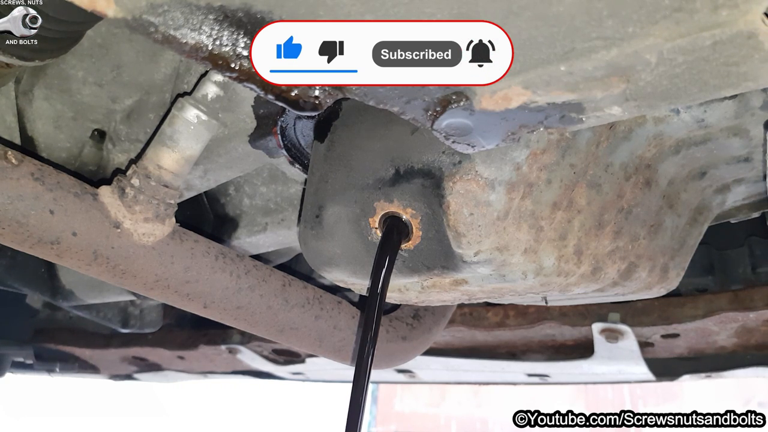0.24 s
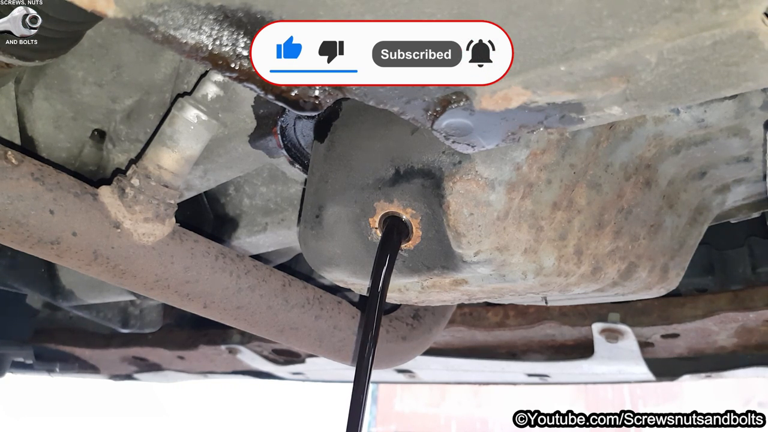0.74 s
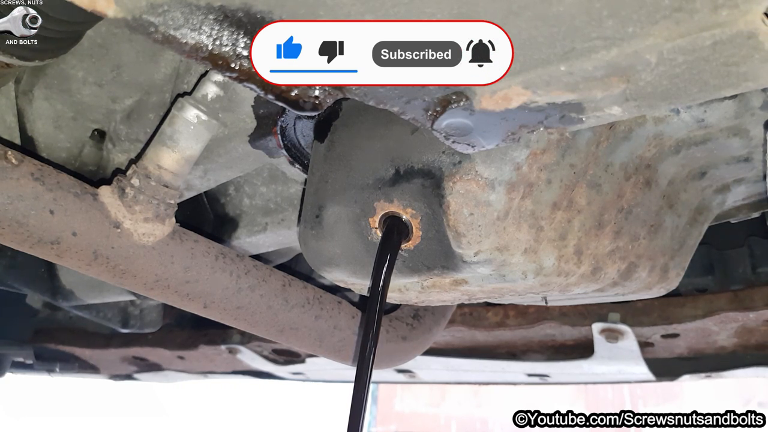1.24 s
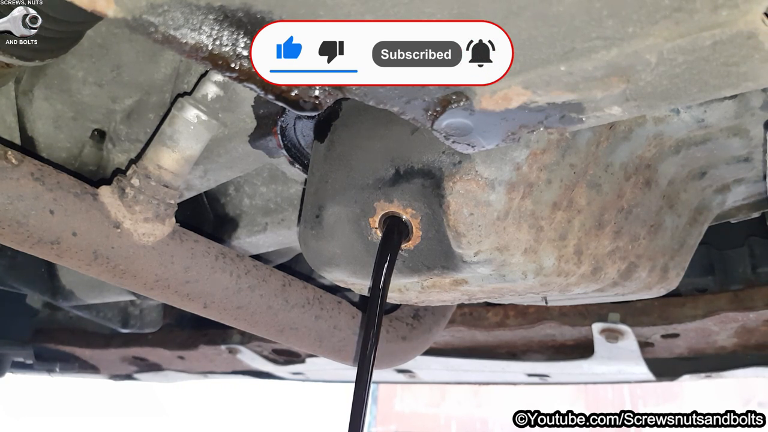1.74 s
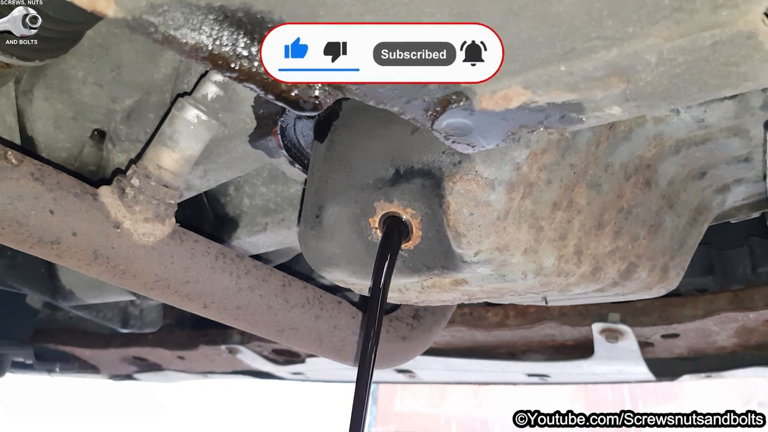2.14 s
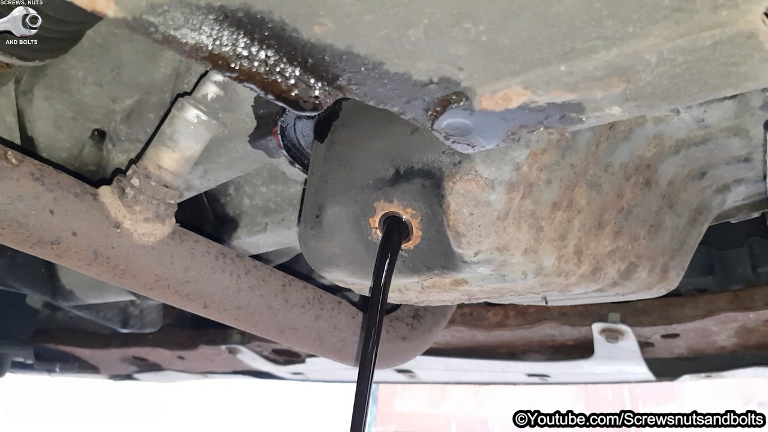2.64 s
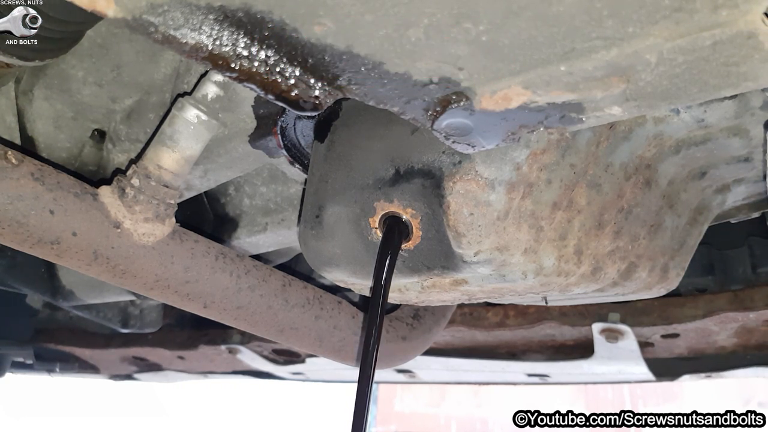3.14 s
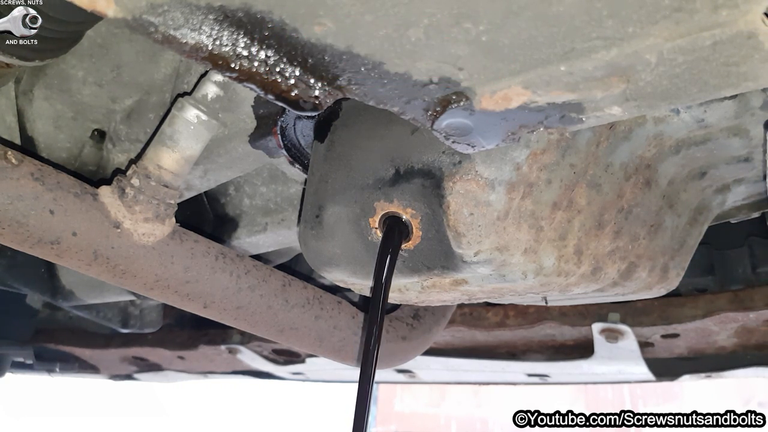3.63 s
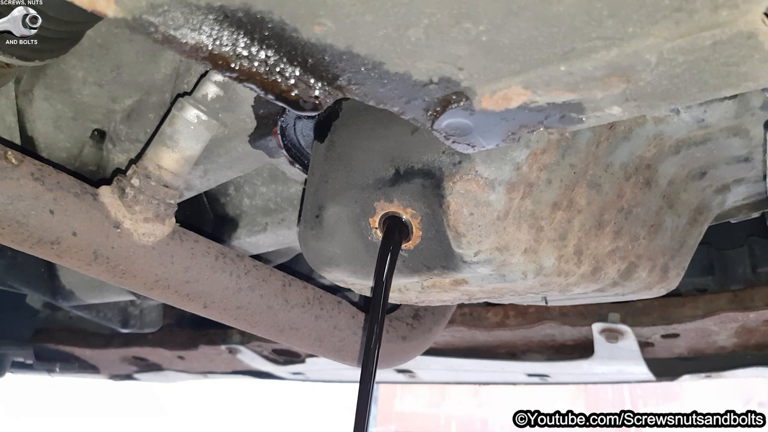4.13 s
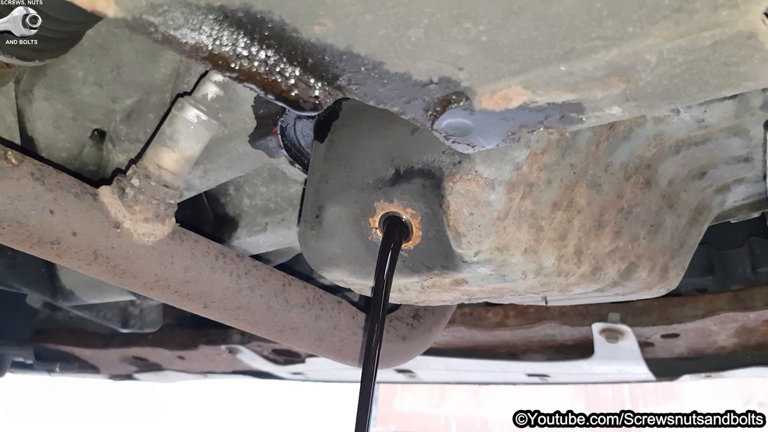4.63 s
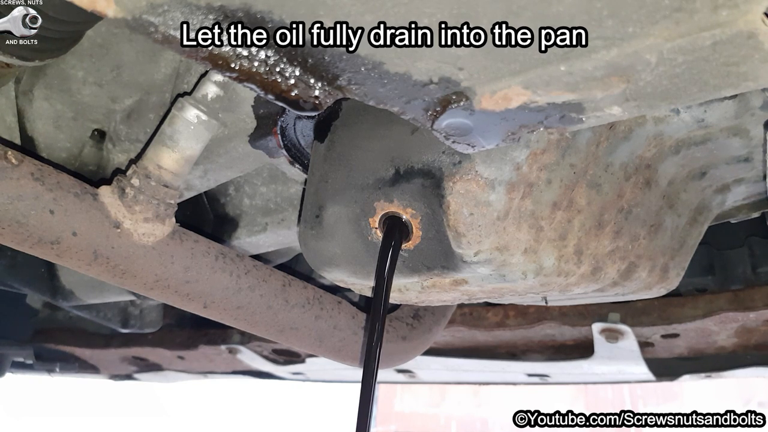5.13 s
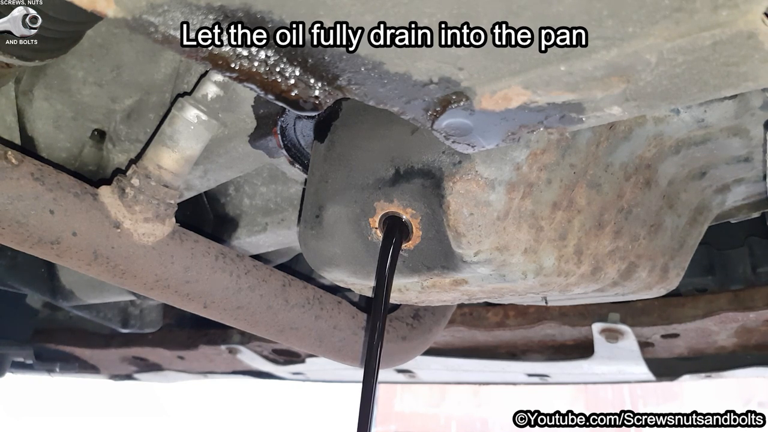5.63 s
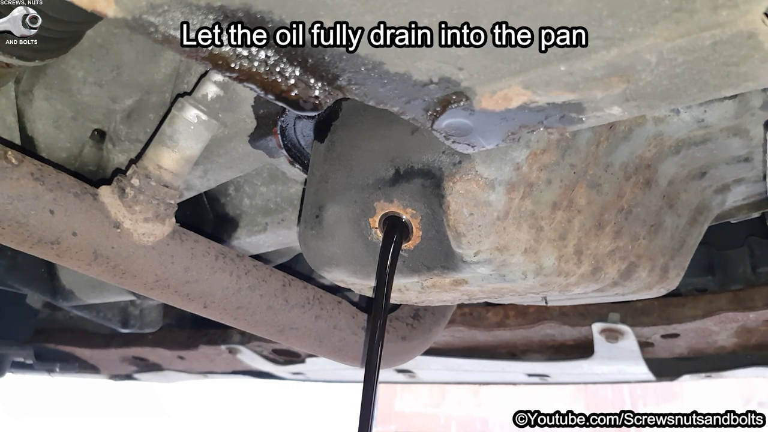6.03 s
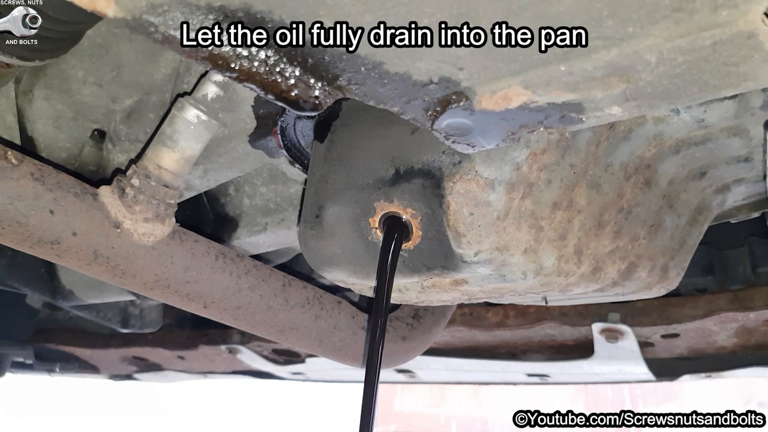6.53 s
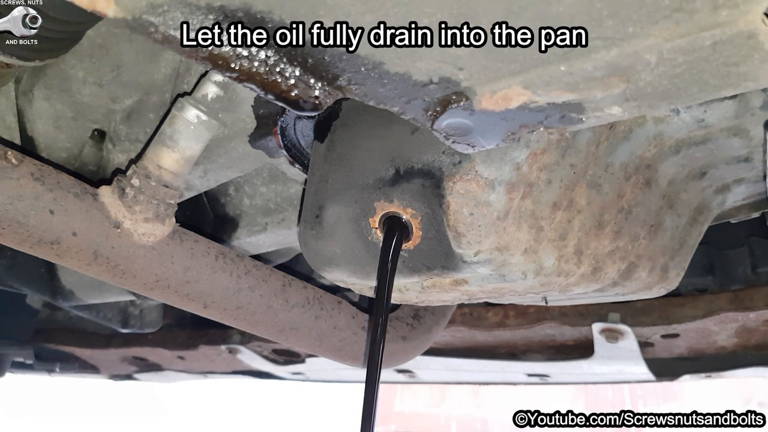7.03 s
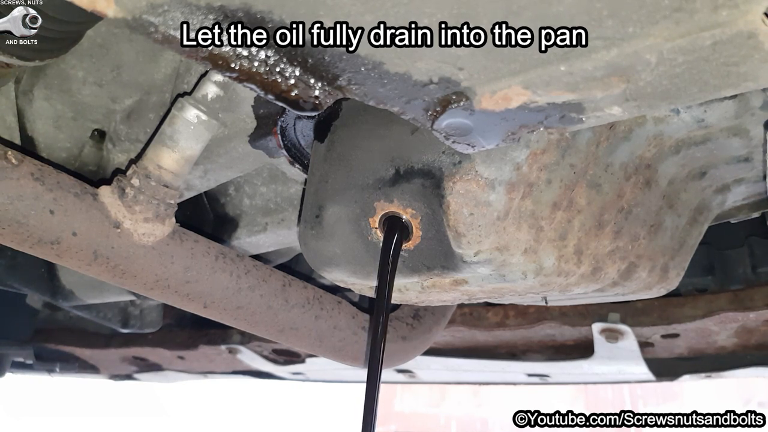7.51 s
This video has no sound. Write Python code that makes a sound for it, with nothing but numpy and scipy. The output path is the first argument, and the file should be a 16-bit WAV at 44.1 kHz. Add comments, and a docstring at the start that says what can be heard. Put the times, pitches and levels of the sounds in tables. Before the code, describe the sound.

Low oil drone around a deep bass pitch swells and fades unevenly throughout, over muffled gulping and churning. Beside it someone shifts: early cloth rubs, snaps and floor scuffs, one bright clink, then mostly oil alone. Later, short gritty metal drags end in ringing clinks, and quick rustles close the scene. Close stereo microphone, sources a little right, only knocks echoing briefly in a garage.

```python
"""Used engine oil runs from a sump into a catch pan on a garage floor, heard close and a little to the right.
The smooth jet plunges into the pool: a pulsing air cavity drones near 80 Hz over soft gulps and churning.
Beside it someone shifts about: clothes rustle as noise swells and snaps, and the floor is scuffed.
A steel tool is dragged in short strokes and clinks; noise and grit ring its modes.
A stereo microphone adds port colour; a faint hiss lies under it all, and only the knocks echo."""
import sys
import numpy as np
from scipy import signal
from scipy.io import wavfile

SR = 44100
rng = np.random.default_rng(int(sys.argv[2]) if len(sys.argv) > 2 else 0)


def store_pcm(level_fs):
    """Save levels as 16-bit WAV."""
    pcm = np.round(np.clip(level_fs, -1, 1) * 32767).astype(np.int16)
    wavfile.write(sys.argv[1], SR, np.atleast_2d(pcm).T)


N = 342462   # samples


def from_db(db):
    """Decibels to gain."""
    return 10 ** (np.asarray(db) / 20)


def rms_one(x):
    """Scale to unit power."""
    return x / np.sqrt(np.mean(x ** 2) + 1e-20)


def in_time(rows):
    """The columns of a curve, sample by sample."""
    s, *columns = np.transpose(rows)
    return [np.interp(np.arange(N) / SR, s, column) for column in columns]


def panned(x, pan_db):
    """Place a sound by its left-right level difference; negative is to the right."""
    left = from_db(pan_db / 2) * np.ones(N)
    return x * np.array([left, 1 / left])


def filtered(x, order, hz, kind):
    """Butterworth filter: a band, or all above or below one frequency."""
    return signal.sosfilt(signal.butter(order, hz, kind, fs=SR, output="sos"), x)


def drift(rate_hz):
    """Slow chance with spread 1: noise through two equal low-pass poles."""
    step, settle = 40, 2000   # samples per slow value; slow values dropped at the start
    r = np.exp(-2 * np.pi * rate_hz * step / SR)
    noise = rng.standard_normal(N // step + settle + 2)
    slow = signal.lfilter([1], [1, -2 * r, r * r], noise)[settle:]
    return np.interp(np.arange(N) / step, np.arange(len(slow)), rms_one(slow))


def grains(per_s, spread_db):
    """Random clicks of uneven size and either sign, at unit power."""
    size_db = spread_db * np.minimum(rng.exponential(1, N), 4)
    sizes = from_db(size_db) * rng.choice([-1, 1], N)
    return rms_one(sizes * (rng.random(N) < per_s / SR))


def coloured(spectrum, flicker_db, flicker_rate, alike_hz):
    """Stereo noise in flickering third-octave bands; the two sides agree more the lower the band."""
    points, levels = np.transpose(spectrum)
    bands = int(3 * np.log2(points[-1] / points[0]))
    edges = np.geomspace(points[0], min(points[-1], .45 * SR), bands + 1)
    white, out = rng.standard_normal((2, 2, N)), 0
    for k, (low, high) in enumerate(zip(edges, edges[1:])):
        mid, side = filtered(white[k % 2], 2, [low, high], "band")
        hz = np.sqrt(low * high)
        alike = 1 / (1 + (hz / alike_hz) ** 2)
        level_db = np.interp(np.log(hz), np.log(points), levels)
        gain = from_db(level_db + flicker_db * drift(flicker_rate))
        shared, opposed = np.sqrt(1 + alike) * mid, np.sqrt(1 - alike) * np.array([side, -side])
        out = out + gain * (shared + opposed)
    return rms_one(out)


def contacts(events, decay_s):
    """Each contact is a short decaying crunch of noise, different on the two sides."""
    starts = np.zeros(N)
    for s, db in events:
        starts[round(s * SR)] = from_db(db)
    envelope = signal.lfilter([1], [1, -np.exp(-1 / (decay_s * SR))], starts + 1e-18)
    return envelope * rng.standard_normal((2, N))


def resonance(drive, hz, width_hz):
    """A two-pole band-pass resonance with gain close to 1 on top."""
    r = np.exp(-np.pi * width_hz / SR)
    feedback = [1, -2 * r * np.cos(2 * np.pi * hz / SR), r * r]
    return signal.lfilter((1 - r * r) / 2 * np.array([1, 0, -1]), feedback, drive + 1e-18)


def ringing(drive, modes):
    """Modes driven together, with alternating sign."""
    return sum((-1) ** k * from_db(db) * resonance(drive, hz, width)
               for k, (hz, width, db) in enumerate(modes))


def stroke(start_s, rise_s, hold_s, fall_s):
    """Gain of one movement: it climbs 20 dB in rise_s, holds, and drops 20 dB in each fall_s."""
    t = np.arange(N) / SR - start_s
    return from_db(-20 * np.clip(np.maximum(-t / rise_s, (t - hold_s) / fall_s), 0, 10))


# the cavity round the jet locks into surges of droning: start_s, length_s, level_db
DRONE_SURGES = [(0.01, 0.19, -37), (0.213, 0.2, -29.5), (.515, .14, -29.5), (0.73, 0.11, -32),
                (0.86, 0.29, -40.5), (1.56, 0.9, -32.5), (2.39, 0.49, -33.5), (2.68, 0.27, -31),
                (3.11, .21, -32.5), (3.493, 0.24, -34), (3.819, .55, -36.5), (4.375, .31, -35),
                (4.722, 0.26, -31), (5.025, 0.25, -34.5), (5.391, 0.43, -36.5), (5.858, 0.19, -39.5),
                (6.02, 0.3, -36), (6.292, 0.26, -35), (6.783, 0.2, -37), (7.128, .12, -34.5)]
SURGE_ATTACK_S, SURGE_RELEASE_S = 0.058, 0.14


def surge(start_s, length_s):
    """Gain of one surge: a rounded attack, a hold and a rounded release."""
    t = np.arange(N) / SR - start_s
    ramp = np.minimum(t / SURGE_ATTACK_S, (length_s - t) / SURGE_RELEASE_S)
    return np.sin(np.pi / 2 * np.clip(ramp, 0, 1))


# pitch of the plunging jet: time_s, pitch_hz
JET_PITCH_CURVE = [(0, 87.5), (.24, 97.4), (.65, 99), (.86, 81.6), (1.15, 76.5), (1.9, 78.5), (2.44, 81),
                   (3.48, 81.85), (5.5, 86.3), (6.3, 83), (7.77, 81)]
# steady buzz under the surges, as the level of its octave: time_s, level_db
BUZZ_CURVE = [(0, -42), (.2, -49), (.35, -44.5), (.55, -61.5), (1.1, -57), (1.23, -39), (1.358, -44.5),
              (1.94, -38), (2.1, -45), (2.44, -48.5), (2.6, -45.5), (3.3, -42), (3.5, -47), (4.4, -52),
              (5.6, -47.5), (5.8, -54), (7.77, -49)]
BUZZ_FUNDAMENTAL_DB, BUZZ_UPPER_DB = 2.5, -14   # relative to the octave
# upper partials of the buzz: multiple, relative_db
BUZZ_OVERTONES = [(3, -1.5), (4, -9), (5, -12), (6, -24.5)]
# air gulped under the surface, here and in gulps(): time_s, relative_db
GULP_CURVE = [(0, -48.5), (.75, -44), (1.6, -52), (2.9, -50.5), (4.3, -51.5), (5.4, -51), (5.75, -48),
              (7.77, -52)]
# a slower sway of the pool builds up and stays
SWAY_HZ, SWAY_START_DB, SWAY_DB = 51.1, -61.5, -49
SWAY_FULL_S, SWAY_BUILD_S = 6, 0.63
COUPLING_DB = 33   # how strongly the sway rocks the droning cavity


def jet_drone():
    """The cavity round the jet pulses almost regularly, in surges; gulps upset its rhythm."""
    pitch, buzz_db, gulp_db = (in_time(rows)[0] for rows in (JET_PITCH_CURVE, BUZZ_CURVE, GULP_CURVE))
    upset = from_db(gulp_db - np.max(gulp_db))
    jitter = 2 * 0.01554 * upset * drift(16.27)
    phase = 2 * np.pi * np.cumsum(pitch * (1 + jitter)) / SR

    # surges and steady buzz add in power
    surging = sum((from_db(db) * surge(s, length)) ** 2 for s, length, db in DRONE_SURGES)
    depth = np.sqrt(surging + from_db(buzz_db + BUZZ_FUNDAMENTAL_DB) ** 2)
    first = depth * from_db(-0.24 * drift(18)) * np.sin(phase)
    octave = from_db(buzz_db + 2.5 * drift(12.5)) * np.sin(2 * phase + .5 * drift(1.2))
    upper = 0
    for multiple, db in BUZZ_OVERTONES:
        gain = from_db(buzz_db + BUZZ_UPPER_DB + db + 3.5 * drift(12))
        upper = upper + gain * np.sin(round(multiple) * phase + 0.56 * drift(5.9))

    # the sway rocks the cavity, which adds a tone at the sum of the two rates
    sway_db, = in_time([(SWAY_FULL_S - SWAY_BUILD_S, SWAY_START_DB), (SWAY_FULL_S, SWAY_DB)])
    sway_phase = 2 * np.pi * np.cumsum(SWAY_HZ * (1 + 0.041 * drift(5.15))) / SR
    rocked = depth * from_db(COUPLING_DB) * np.sin(phase + sway_phase)
    sway = from_db(sway_db + 1.4 * drift(6.1)) * (np.sin(sway_phase) + rocked)
    # root 2 gives each sine the power its level states
    return np.sqrt(2) * (panned(first + sway, -.7) + panned(octave, -3.6) + panned(upper, -1.2))


# sloshing resonances of the filled pan: pitch_hz, width_hz, relative_db
POOL_MODES = [(48.5, 18, -0.5), (89.5, 9.5, 3), (126.2, 26.5, 1.5), (184, 90, -20.5), (280, 63, -13.5)]


def gulps():
    """Pockets of air collapse in the thick oil and rock the pool's damped resonances."""
    level_db, = in_time(GULP_CURVE)
    pool = sum(from_db(db) * rms_one(resonance(grains(150, 1.4), hz, width))
               for hz, width, db in POOL_MODES)
    pool = filtered(pool, 2, [40, 380], "band")
    return panned(from_db(level_db - 1.0) * pool, -3.0)


# churning where the jet enters, power per Hz: frequency_hz, relative_db
CHURN_COLOUR = [(25, 1.5), (50, 10), (150, 3.5), (300, -2.5), (450, -5), (700, -12.5), (1100, -14),
                (1500, -24), (2500, -34), (5000, -48)]
CHURN_DB = -55.5   # before panning


def churn():
    """A dull, flickering wash of noise; its upper part comes more from the right."""
    wash = from_db(CHURN_DB) * coloured(CHURN_COLOUR, flicker_db=2.0, flicker_rate=22, alike_hz=590)
    upper = filtered(wash, 1, [560, 880], "band")
    return panned(wash - upper, -1.7) + panned(upper, -16)


# steady faint hiss, power per Hz: frequency_hz, relative_db
HISS_COLOUR = [(1000, 15), (2500, 4), (4000, 0), (6500, 2.5), (8000, -8), (11000, 6), (16000, 9)]
HISS_DB = -72   # before panning


def faint_hiss():
    """Bright noise without flicker, nearly independent on the two sides."""
    hiss = coloured(HISS_COLOUR, flicker_db=0.0, flicker_rate=8, alike_hz=200)
    return panned(from_db(HISS_DB) * hiss, -1.2)


# clothes and soles swell, hold and die away; rise and fall are times for 20 dB:
# full_s, rise_s, hold_s, fall_s, rub_relative_db, swish_relative_db
MOVEMENTS = [(0.0, .1, 0.0074, 0.38, -53.5, -59.5), (0.294, 0.14, 0.23, 0.088, -55, -53.5),
             (0.387, 0.046, 0.024, 0.042, -52.5, -54), (0.596, .1, 0.12, 0.05, -59, -57.5),
             (0.982, 0.27, 0.071, 0.2, -50, -48.5), (1.33, 0.23, .02, 0.65, -87, -70.5),
             (1.606, 0.2, .02, 0.39, -60.5, -58.5), (1.948, 0.56, 0.026, 0.22, -62.5, -60),
             (2.62, 1, .03, 0.37, -91, -73.5), (4.747, 0.12, .17, 0.25, -63.5, -63),
             (5.265, 0.31, .33, .3, -84, -67.5), (5.64, 0.83, .28, 0.16, -63, -68.5),
             (6.086, 0.22, 0.035, .1, -76, -67), (6.301, 0.22, 0.17, 0.16, -64.5, -67.5),
             (6.53, 0.2, 0.3, 0.69, -76.5, -72), (7.166, 0.19, 0.028, 0.081, -69.5, -57),
             (7.3, 0.071, 0.014, .1, -62.5, -56), (7.388, .04, 0.018, 0.36, -72, -64.5),
             (7.533, 0.024, 0.026, 0.27, -61, -59.5), (7.637, 0.024, 0.027, 0.087, -58, -59.5),
             (7.72, .03, .05, .2, -58.5, -64)]


def movement_gains():
    """How hard the clothes rub and swish; overlapping movements add in power."""
    power = sum((from_db([[rub_db], [swish_db]]) * stroke(s, rise, hold, fall)) ** 2
                for s, rise, hold, fall, rub_db, swish_db in MOVEMENTS)
    return np.sqrt(power)


# dull rub of cloth, power per Hz: frequency_hz, relative_db
RUB_SPECTRUM = [(300, -10), (600, 5), (900, 2.5), (1300, 3.5), (1700, 3.5), (2400, 2.5), (3500, -2.5),
                (5000, -3.5), (8000, -21)]
# bright swish of cloth, power per Hz: frequency_hz, relative_db
SWISH_SPECTRUM = [(2500, -10.5), (4200, -3), (6500, 1.5), (8300, -0.5), (11000, 4), (13000, 1.5),
                  (16000, 2)]
# creases and grit snapping: start_s, drive_db
SNAPS = [(0.168, -45), (0.298, -36), (1.301, -69), (1.341, -48.5), (1.782, -39.5), (1.939, -46),
         (2.092, -48.5), (6.111, -49), (6.193, -42), (6.387, -36), (7.268, -40), (7.297, -42),
         (7.39, -42.5), (7.536, -45), (7.634, -41), (7.72, -47)]


def clothes():
    """Fibres catch and slip: a dull rub, a bright swish and a few snapping creases."""
    rub = coloured(RUB_SPECTRUM, flicker_db=2.0, flicker_rate=18.5, alike_hz=300)
    rub = rub * from_db(0.29 * drift(160))
    swish = coloured(SWISH_SPECTRUM, flicker_db=1.6, flicker_rate=16, alike_hz=300)
    # each slip starts at once and dies in a few milliseconds
    slips = signal.lfilter([1], [1, -np.exp(-1 / (0.0068 * SR))], np.abs(grains(160, 3.0)))
    swish = from_db(2.1) * rms_one(swish * (1 + 0.2 * rms_one(slips)))
    snaps = from_db(-5) * filtered(contacts(SNAPS, decay_s=0.0063), 2, [5500, 15500], "band")
    rub_gain, swish_gain = movement_gains()
    return panned(rub_gain * rub, -6.5) + panned(swish_gain * swish, -7.0) + panned(snaps, -4.5)


def hollow_rub():
    """The hardest rubs also sound a broad hollow resonance, which grows faster than the rubbing."""
    force = movement_gains()[0]
    tone = rng.standard_normal((2, N))
    for stage in range(2):
        tone = resonance(tone, 2570, 1480)
    return panned(from_db(-54.5) * (force / force.max()) ** 1.8 * rms_one(tone), -8.5)


# dull scuffs on the floor: start_s, drive_db
SCUFF_CONTACTS = [(0.298, -41.5), (0.333, -38), (1.008, -33), (1.026, -49.5), (6.196, -43), (6.21, -50.5),
                  (6.231, -49), (6.352, -47.5)]
# their hollow body: pitch_hz, width_hz, relative_db
SCUFF_BODY = [(307, 37, -3.5), (593, 132, -2), (710, 87, 2.5), (788, 170, -4.5), (930, 440, -10),
              (2630, 550, -15)]


def scuffs():
    """Soft contacts on the floor set a hollow body ringing."""
    body = ringing(contacts(SCUFF_CONTACTS, decay_s=0.013), SCUFF_BODY)
    return panned(from_db(17.5) * filtered(body, 2, 3200, "low"), -2.5)


# steel tool dragged over concrete, harder and harder until it stops: start_s, length_s, final_drive_db
TOOL_DRAGS = [(6.174, 0.036, -62.5), (6.226, 0.14, -49.5), (6.386, .03, -47), (7.55, .11, -64),
              (7.68, .1, -56)]
DRAG_GROWTH_DB_PER_S, DRAG_ATTACK_S, DRAG_RELEASE_S = 103, 0.0073, 0.033   # times for 20 dB


def drag_gain():
    """The pressure on the tool grows steadily in dB through each drag and is let go at its end."""
    t, gain = np.arange(N) / SR, 0
    for s, length, db in TOOL_DRAGS:
        remaining_s = np.clip(s + length - t, 0, length)
        growth = from_db(db - DRAG_GROWTH_DB_PER_S * remaining_s)
        gain = gain + growth * stroke(s, DRAG_ATTACK_S, length, DRAG_RELEASE_S)
    return gain


# the tool catches and clinks: start_s, drive_db
TOOL_CLINKS = [(1.007, -25), (6.181, -41), (6.35, -22.5), (6.409, -20.5), (7.643, -43)]
# the tool's modes, damped by the hand: pitch_hz, width_hz, relative_db
STEEL_MODES = [(1420, 42, -11), (1587, 52, -4), (1843, 14, -3.5), (2100, 97, -8), (2820, 86, -8.5),
               (3010, 56, 4.5), (3091, 23, 4), (3213, 50, 0.5), (3650, 65, -3), (3830, 310, -11),
               (5200, 570, -22), (6850, 360, -21)]


def steel_tool():
    """Grit ticks against the dragged steel and hisses; where it catches, the same modes ring out."""
    drag = drag_gain()
    grit = drag * np.array([grains(3000, 1.3) for side in range(2)])
    catching = from_db(1.8 * drift(60))
    drive = from_db(19.0) * catching * grit + from_db(8.0) * contacts(TOOL_CLINKS, decay_s=0.0025)
    steel = filtered(ringing(drive, STEEL_MODES), 4, 1300, "high")
    # the harder it is pressed, the more bright scratch it adds
    pressed = filtered(grit * (drag / drag.max()) ** 0.33, 2, 3500, "high")
    scratch = resonance(pressed, 6800, 1800) + resonance(pressed, 12100, 3900)
    return panned(steel, -5.5) + panned(from_db(10.0) * scratch, -0.83)


GARAGE_T60_S, GARAGE_DB = 0.15, -14.5


def garage(x):
    """Six feedback delays a side, between floor, underbody and walls."""
    out = np.zeros((2, N))
    lags = (rng.uniform(.008, 0.044, size=12) * SR).astype(int)
    for k, lag in enumerate(lags):
        loop, gain = x[k % 2].copy(), from_db(-60 * lag / SR / GARAGE_T60_S)
        for i in range(lag, N, lag):
            loop[i:i + lag] += gain * loop[i - lag:i][:N - i]
        out[k % 2] += (loop - x[k % 2]) * (-1) ** (k // 2)   # echoes only
    return out / 2


def left_later(x, lag_s):
    """Sound from the right reaches the left port a little later."""
    n = np.arange(N)
    return np.array([np.interp(n - lag_s * SR, n, x[0]), x[1]])


def scene():
    """The pan and the person are both a little to the right; only the knocks echo in the garage."""
    oil = left_later(jet_drone() + gulps() + churn(), lag_s=0.00033)
    person = clothes() + hollow_rub()
    knocks = scuffs() + steel_tool()
    echoes = from_db(GARAGE_DB) * garage(knocks)
    return oil + faint_hiss() + person + knocks + echoes


# the microphone port colours the treble: pitch_hz, width_hz, gain_db
PORT_COLOUR = [(6750, 550, 1), (8200, 970, -3.5), (9400, 800, 1.5)]


def record(dry):
    """The microphone loses the deepest bass and its port colours the treble; the top is cut."""
    heard = filtered(dry, 2, 30, "high")
    for hz, width, db in PORT_COLOUR:
        heard = heard + (from_db(db) - 1) * resonance(heard, hz, width)
    top_cut = signal.ellip(10, .1, 80, 15900, fs=SR, output="sos")   # steep, at 15900 Hz
    return signal.sosfilt(top_cut, heard)


dry = scene()
out = record(dry)
store_pcm(out)
```